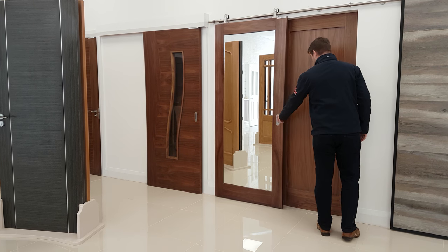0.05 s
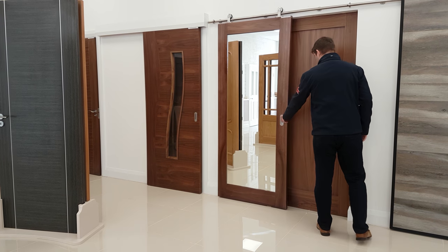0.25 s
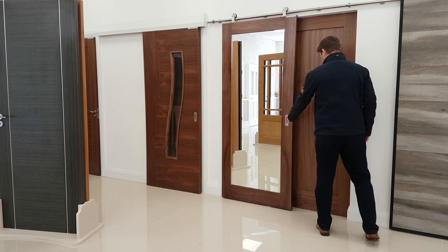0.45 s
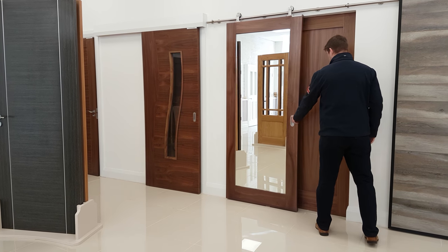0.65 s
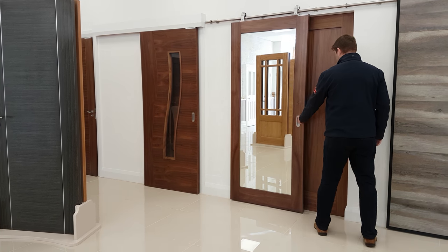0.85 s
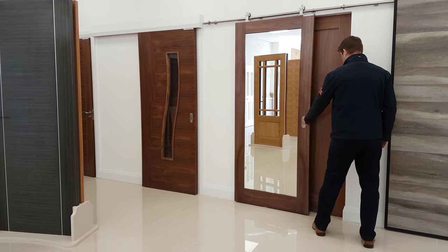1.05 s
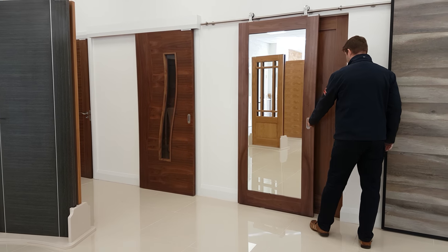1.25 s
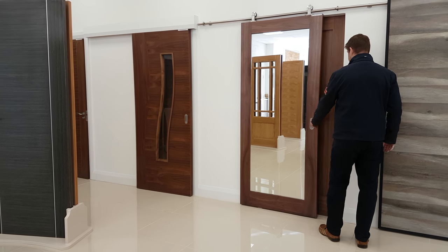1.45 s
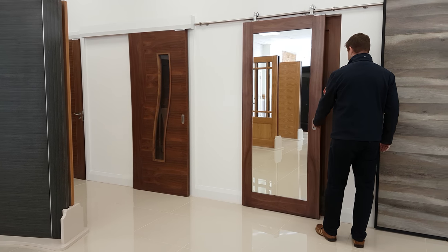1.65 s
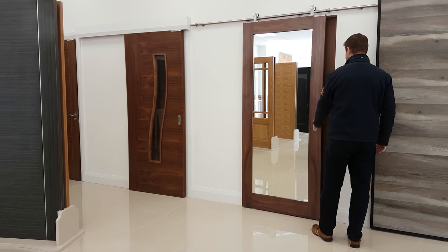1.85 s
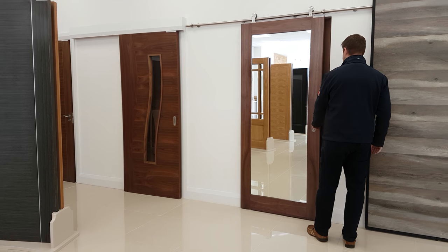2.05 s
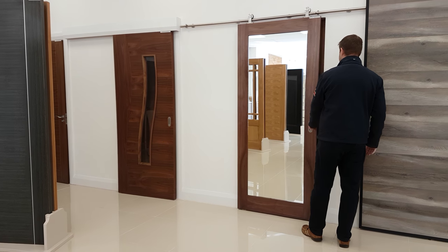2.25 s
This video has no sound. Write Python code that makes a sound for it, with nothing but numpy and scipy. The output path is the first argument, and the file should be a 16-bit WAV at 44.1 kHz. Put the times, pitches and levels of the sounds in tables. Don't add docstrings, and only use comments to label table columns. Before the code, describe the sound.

A wooden sliding door rumbles low along a wall track, heard a few metres off by a phone in a quiet, hard-floored showroom. Faint jacket swish and thin metallic hiss build first; around 0.6 s come small ticks, woody knocks and a heavy shoe thud. Dull jolts peak near 1 s, soft steps follow, cloth swishes at 1.45 s, rolling fades, and a tiny sole squeak chirps at 2 s over faint hum and hiss.

```python
import sys
import numpy as np
from scipy import signal
from scipy.fft import rfft, irfft, next_fast_len
from scipy.io import wavfile
from scipy.ndimage import uniform_filter1d

SR = 44100
rng = np.random.default_rng(int(sys.argv[2]) if len(sys.argv) > 2 else 0)


def file_out(sig):
    cols = np.atleast_2d(sig).T
    lim = np.clip(cols, -1, 1)
    pcm = np.round(lim * 32767).astype(np.int16)
    wavfile.write(sys.argv[1], SR, pcm)


def voltage_ratio(level):
    return 10 ** (np.asarray(level, float) / 20)


N = 101429
T = np.arange(N) / SR
M = next_fast_len(N + SR // 4, True)
F = np.fft.rfftfreq(M, 1 / SR) + 1
LEFT_RIGHT = np.array([[1], [-1]])


def level(x, db):
    return x * voltage_ratio(db) / np.sqrt(np.mean(x ** 2))


def table(rows):
    rows = np.array(rows, float)
    return np.interp(np.log(F), np.log(rows[:, 0]), rows[:, 1])


def filt(x, gain):
    return irfft(rfft(x, M) * gain, M)[..., :N]


def colour(x, rows):
    rolloff = np.sqrt(1 + (F / rows[-1][0] / 1.31) ** 8)
    return filt(x, voltage_ratio(table(rows)) / rolloff)


def ring(x, hz, t60):
    r = np.exp(-np.log(1000) / (t60 * SR))
    turn = 2 * np.pi * hz / SR
    return signal.lfilter([np.sin(turn)], [1, -2 * r * np.cos(turn), r * r], x)


def thuds(rows, rise):
    out = np.zeros(N)
    for start, db, hz, t60 in rows:
        since = np.clip(T - start, 0, None)
        envelope = (1 - np.exp(-since / rise)) * np.exp(-np.log(1000) * since / t60)
        out += 2 * voltage_ratio(db) * envelope * np.sin(2 * np.pi * hz * since)
    return out


def half_sine(start, length):
    return np.sin(np.pi * np.clip((T - start) / length, 0, 1))


def walk(rate):
    hold = int(SR / rate)
    steps = np.repeat(rng.standard_normal(N // hold + 1), hold)
    return 1.18 * uniform_filter1d(uniform_filter1d(steps, hold), hold)[:N]


def wide(rows, alike):
    mid, side = rng.standard_normal((2, N))
    return colour(filt(mid, np.sqrt(1 + alike)) + filt(side, np.sqrt(1 - alike)) * LEFT_RIGHT, rows)


# (frequency [Hz], likeness [-1 to 1])
ALIKE = [(60, 0.98), (130, 0.97), (290, 0.86), (640, 0.66), (1410, 0.25), (3100, 0.37), (6820, -0.04),
         (15000, -0.02)]


def likeness():
    return np.clip(table(ALIKE), 0, 1)


def space(x, wet_db, t60):
    decay = np.exp(-np.log(1000) * T / t60) * (T > .002)
    tails = rng.standard_normal((2, N)) * decay
    mid, side = rfft(tails / np.sqrt(np.sum(tails[0] ** 2)), M)
    alike = likeness()
    common = np.sqrt((1 + alike) / 2) * (1 + voltage_ratio(wet_db) * mid)
    return filt(x, common + np.sqrt((1 - alike) / 2) * side * LEFT_RIGHT)


# (frequency [Hz], level [dB])
HISS = [(1880, -38), (3200, -12), (4060, 2), (4670, -9), (5260, -14.5), (5880, -22.5), (6850, -10),
        (8520, -10.5), (15600, -2.5)]


def microphone_hiss():
    return level(wide(HISS, 0.), -74.5)


# (frequency [Hz], level [dB])
AIR = [(25, -18), (50, -1), (100, -4.5), (250, -17.5), (400, -5.5), (800, -14.5), (2500, -20.5),
       (5000, -36.5)]


def room_air():
    return level(wide(AIR, likeness()), -58.5)


# (frequency [Hz], level [dB])
HUM = [
    (50, -60.5),
    (100, -64.5),
]


def lamp_hum():
    return sum(voltage_ratio(db + 2.0 * walk(7.5)) * np.sin(2 * np.pi * hz * T) for hz, db in HUM)


# (frequency [Hz], level [dB])
CLOTH = [(2500, -22), (4000, 0), (6000, -4.5), (8500, -3.5), (10000, -2), (12000, -0.5), (13500, -3),
         (15500, -3.5)]
# (start [s], full [s], fading [s], end [s], level [dB])
SWISH = [
    (.0, .45, .67, 0.77, -77.5),
    (.99, 1.016, 1.1, 1.18, -81),
    (1.348, 1.447, 1.47, 1.65, -70.5),
]
# (time [s], level [dB])
CATCHES = [
    (.1, -74.5),
    (.36, -84),
    (.42, -80),
    (.47, -75),
    (.61, -72.5),
    (.65, -78),
    (.68, -80),
]


def jacket():
    swell = np.zeros(N)
    for start, full, fading, end, db in SWISH:
        rub = np.interp(T, [start, full, fading, end], [0, 1, 1, 0])
        swell += voltage_ratio(db) * np.sin(np.pi / 2 * rub) ** 2
    swell *= voltage_ratio(1.0 * walk(41.1))
    catch_s, pan_db = .006, -5
    for time, db in CATCHES:
        swell += voltage_ratio(db) * np.exp(-((T - time) / catch_s) ** 2)
    return level(wide(CLOTH, 0.091), 0) * swell * voltage_ratio(LEFT_RIGHT / 2 * pan_db)


# (time [s], level [dB], frequency [Hz], length [s])
SQUEAKS = [
    (1.9865, -58, 2520, .004),
    (1.9865, -67, 1800, .002),
    (1.994, -59, 2760, .005),
    (2.0, -61, 2700, .004),
    (2.007, -68, 2600, .004),
]


def squeaks():
    return sum(2 * voltage_ratio(db) * half_sine(start, length) * np.sin(2 * np.pi * hz * (T - start))
               for start, db, hz, length in SQUEAKS)


# (time [s], level [dB], floor mode [Hz], t60 [s])
STEPS = [
    (.59, -29.5, 64, 0.084),
    (.7, -49, 54.5, 0.43),
    (1.24, -43, 55, .3),
    (1.34, -42.5, 56.2, 0.2),
    (1.75, -46, 94.7, 0.37),
    (1.79, -47.5, 134, 0.43),
    (1.93, -45.5, 55, 0.29),
]


def shoes():
    return thuds(STEPS, rise=.015)


# (centre [Hz], width [Hz], level [dB])
SING = [
    (3910, 550, -78.5),
    (8640, 500, -90.5),
    (11940, 350, -86.5),
]


def runners():
    noise = rng.standard_normal((2, N))
    bands = sum(voltage_ratio(db) * np.sqrt(SR / width) / (1 + (2 * (F - hz) / width) ** 2) for hz, width, db in SING)
    speed = np.interp(T, [.1, .4, .68, .72], [0.27, 0.97, 1, .2])
    return filt(noise, bands) * speed * voltage_ratio(2.0 * walk(25))


# (time [s], level [dB], contact [ms])
KNOCKS = [
    (.578, -50, .6),
    (.639, -46, .4),
    (.645, -46, .4),
    (.653, -50, .5),
]
# (frequency [Hz], level [dB], t60 [s])
TICK_MODES = [(412, 10.5, 0.035), (610, 3, 0.038), (760, 2, 0.024), (942, -2, 0.073), (1196, 2, 0.023),
              (1464, -7, 0.028), (1790, -9, 0.017)]


def knocks():
    push = np.zeros(N)
    for start, db, ms in KNOCKS:
        push += voltage_ratio(db) * half_sine(start, ms / 1000) / (ms / 1000 * SR)
    return 1.56 * sum(voltage_ratio(db) * ring(push, hz, t60) for hz, db, t60 in TICK_MODES)


# (time [s], level [dB], mode [Hz], t60 [s])
JOLTS = [(.21, -62, 239.6, 0.8), (.35, -54.5, 247, 0.8), (.44, -52, 145, 0.13), (.83, -46.5, 310.5, 0.254),
         (.85, -45, 241.3, 0.3), (.85, -49, 136, 0.15), (.93, -42, 263, 0.12), (.97, -34, 268.3, 0.086),
         (1.005, -42.5, 249.2, 0.37), (1.07, -41, 243, 0.27), (1.145, -42, 209.8, 0.33),
         (1.22, -46, 228.6, 0.3), (1.56, -48, 147, 0.17), (1.57, -53, 194.6, 0.4), (1.68, -53, 240.7, 0.24)]
# (time [s], level [dB], mode [Hz], t60 [s])
JOINT = [
    (.573, -49, 290, .12),
    (.598, -42, 132, .3),
    (.61, -46, 180, .2),
    (.636, -41, 205, .25),
    (.663, -40, 248, .3),
    (.688, -47, 310, .2),
    (.715, -42, 138, .22),
]


def jolts():
    rise_s = 0.0041
    return thuds(JOLTS, rise_s) + thuds(JOINT, rise_s)


# (time [s], rolling level [dB])
ROLL = [(0, -70), (.18, -64.5), (.26, -59.5), (.47, -56.5), (.55, -55.5), (.65, -48.5), (.73, -52),
        (.8, -52), (.98, -55.5), (1.08, -50), (1.25, -52.5), (1.45, -54.5), (1.58, -54), (1.8, -59.5),
        (2.0, -63), (2.3, -73.5)]
# (frequency [Hz], level [dB], t60 [s])
DOOR = [(55, 0.5, .5), (72.4, -10, 0.24), (105.8, -17.5, 0.66), (134, -2, 1), (163.4, -5, .3),
        (202.3, 1.5, 0.64), (243, -0.5, 0.45), (288.5, -7, 0.66), (344, -4.5, 0.28), (435.5, -8, 0.15),
        (546, -11.5, 0.05), (638, -14.5, 0.44), (860, -8, 0.17), (1110, -27, 0.033)]
# (frequency [Hz], level [dB per Hz])
TRACK = [(18, -45), (30, -17), (53, -4), (172, -4.5), (243, -4.5), (595, -15.5), (790, -16.5),
         (2300, -33.5), (5500, -49.5), (7150, -75), (12100, -120)]


def rolling():
    effort_db = np.interp(T, *np.array(ROLL, float).T)
    grit_per_s, grit_db, mode_wander_db = 3000, 1.5, 1.5
    hits = rng.random(N) < grit_per_s / SR
    grit = hits * rng.standard_normal(N) * voltage_ratio(grit_db * rng.exponential(size=N))
    grit = level(grit, 0) + 0.75 * rng.standard_normal(N)
    door = np.zeros(N)
    for hz, db, t60 in DOOR:
        door += voltage_ratio(db + mode_wander_db * walk(14.22)) * level(ring(grit, hz, 0.76 * t60), 0)
    track = level(colour(grit, TRACK), -2) * voltage_ratio(0.57 * walk(12.77))
    return voltage_ratio(effort_db) * level(door, 0.22) + track * voltage_ratio(effort_db + 8)


def scene():
    background = room_air() + lamp_hum()
    hits = space(jolts() + shoes(), -11.5, 0.16) + space(squeaks() + knocks(), -15, .03)
    door = space(rolling(), wet_db=-12, t60=0.67)
    return background + jacket() + runners() + hits + door


def roll_off(x):
    return signal.sosfilt(signal.butter(12, 15700, fs=SR, output="sos"), x)


# (frequency [Hz], left minus right [dB])
PORTS = [(60, 0), (300, 0.8), (900, 0.5), (2300, 8.5), (4200, -2), (6500, 7), (9000, -4), (13000, .3)]


def record(dry):
    left_lag_s, low_hz, top_hz = .00011, 39.4, 15720
    lag = np.exp(-2j * np.pi * F * left_lag_s * np.array([[1], [0]]))
    ports = voltage_ratio(LEFT_RIGHT / 2 * table(PORTS)) * lag
    band = (F < top_hz) / np.sqrt(1 + (low_hz / F) ** 6)
    mix = filt(dry + microphone_hiss(), ports * band) - .0005
    return roll_off(mix)


dry = scene()
out = record(dry)
file_out(out)
```